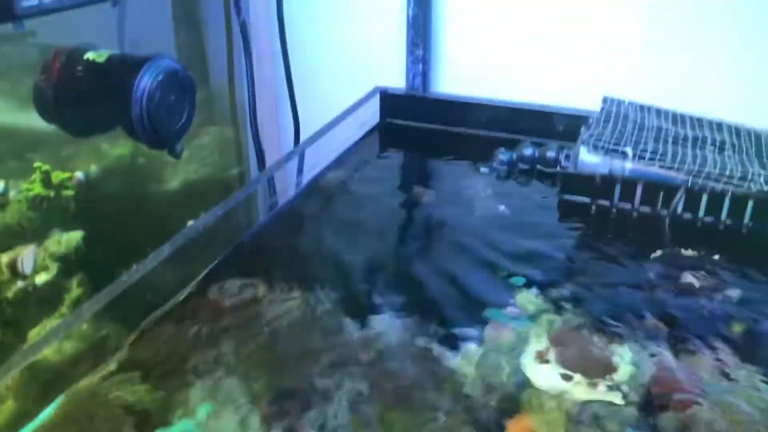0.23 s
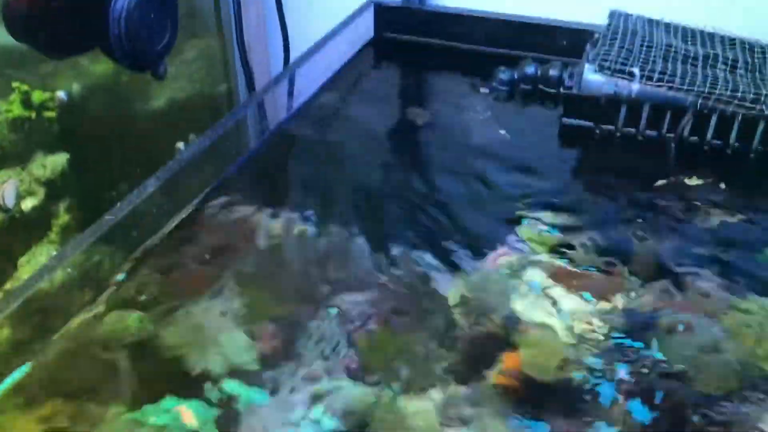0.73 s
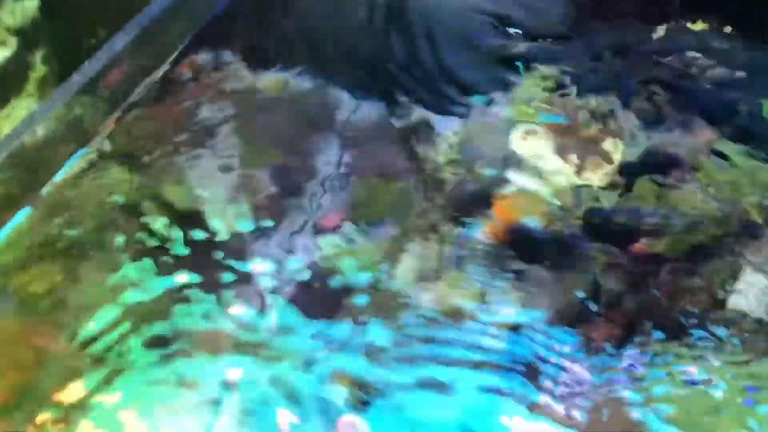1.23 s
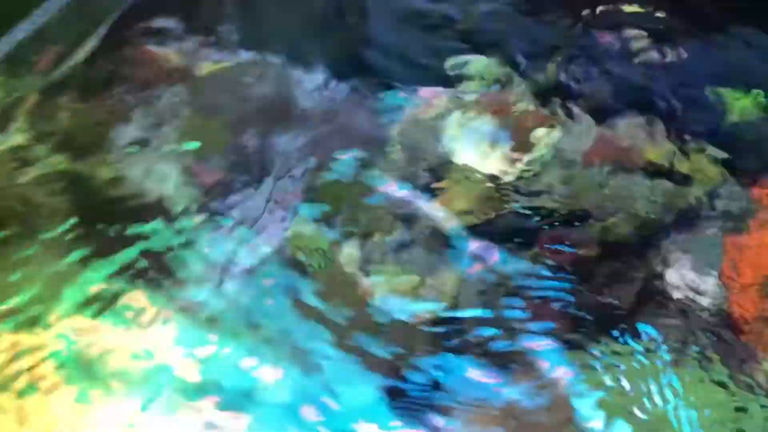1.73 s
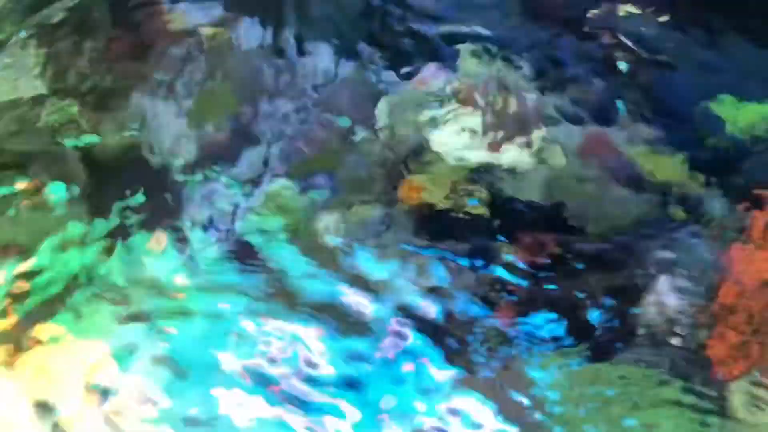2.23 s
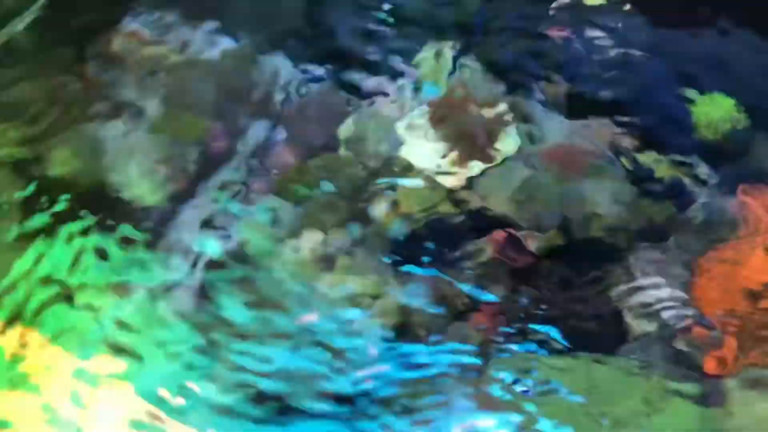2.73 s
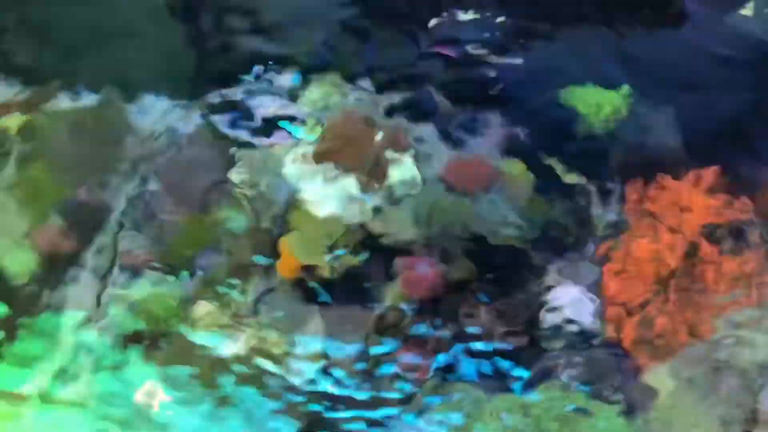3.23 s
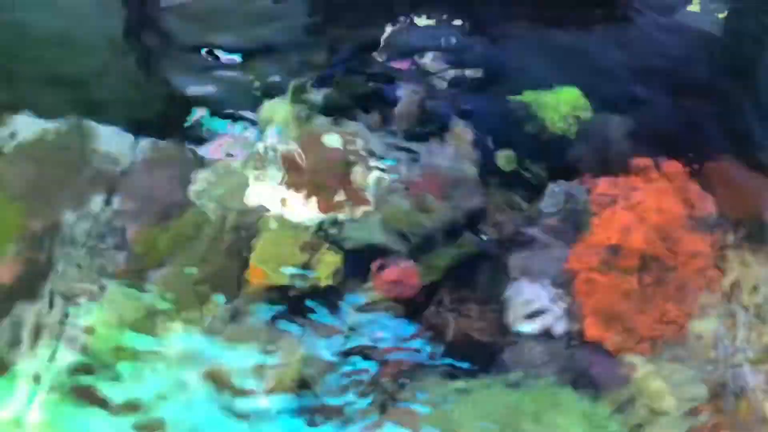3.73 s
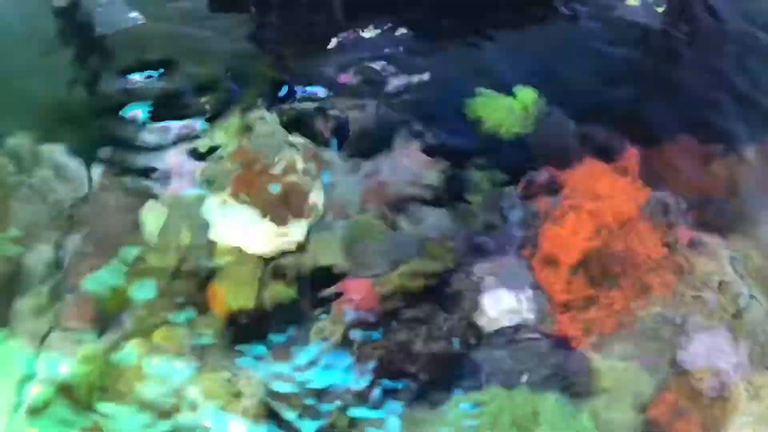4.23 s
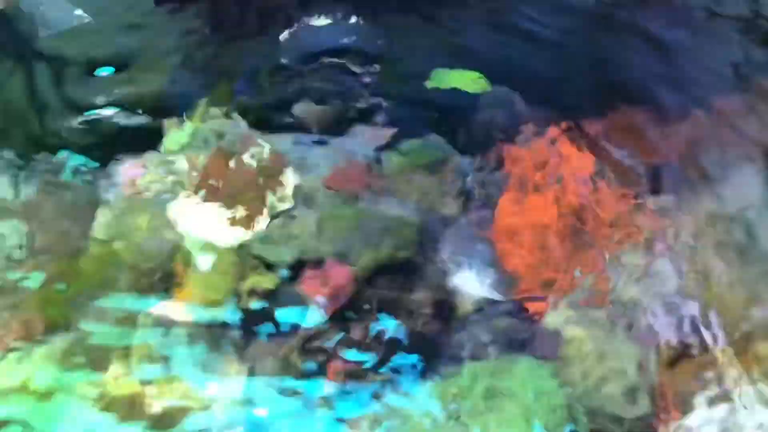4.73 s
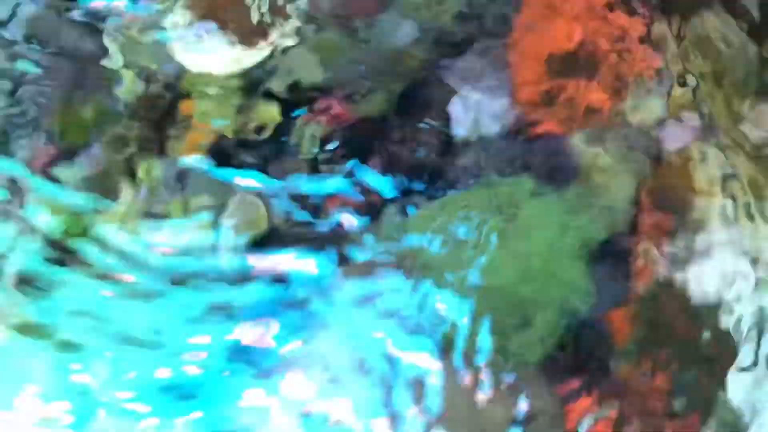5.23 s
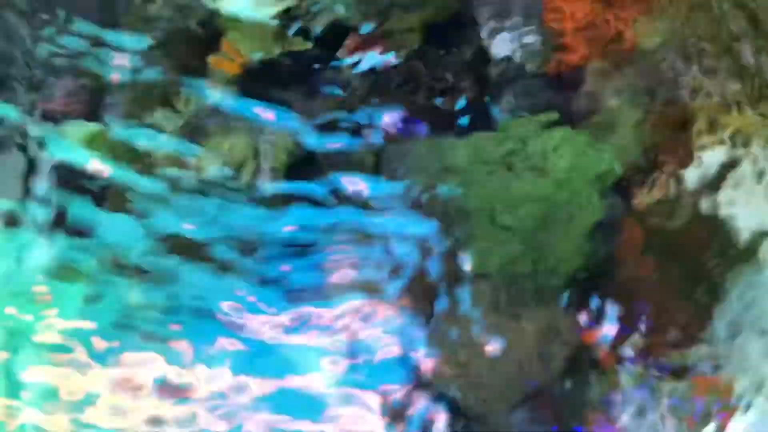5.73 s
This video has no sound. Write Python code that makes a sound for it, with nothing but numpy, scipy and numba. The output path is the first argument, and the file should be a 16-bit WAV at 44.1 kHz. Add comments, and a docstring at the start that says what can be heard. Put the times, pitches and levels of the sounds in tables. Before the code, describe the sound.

A running aquarium pump makes a low, throbbing rumble under a smooth wash of moving water and a faint high whine.

```python
"""A reef tank's pump booms in the lowest resonances of stand and room, heard from a phone over the water.
The flow rings sump and pipe cavities and lays a smooth wash under them, with a thin fizz on top.
A switching supply whines, its pitch swept about 62 times a second through the rings of its housing.
A few soft hisses and faint ticks pass near the microphone."""
import sys
import numpy as np
from scipy import signal
from scipy.fft import rfft, irfft
from scipy.io import wavfile
from scipy.ndimage import uniform_filter1d, map_coordinates
from numba import njit

SR = 44100
rng = np.random.default_rng(int(sys.argv[2]) if len(sys.argv) > 2 else 0)


def wav_record(signal):
    """Record a signal, one row per channel, as 16-bit PCM in the file named by sys.argv[1]."""
    frames = np.transpose(np.atleast_2d(signal))
    bounded = np.clip(frames, -1, 1)
    # unit amplitude maps onto the largest positive 16-bit level
    quanta = np.round(bounded * 32767).astype(np.int16)
    wavfile.write(sys.argv[1], SR, quanta)


N = 264600

# Low resonances of stand and room: (pitch [Hz], width [Hz], level between swells [dB])
BOOM_MODES = [(40.7, 12.6, -37.5), (60.87, 7.7, -39), (80.87, 5.9, -42)]
# Short, strong swells of the boom: (centre time [s], resonance [Hz], gain [dB])
BOOM_SWELLS = [(.12, 41, 5.5), (.12, 60, 7), (.55, 41, 9.5), (.67, 60, 3), (.93, 41, 8.5), (1.45, 60, 8.5),
               (1.52, 41, 8.5), (1.92, 60, 13.5), (2.08, 41, 6), (2.08, 60, 9), (2.44, 41, 3.5),
               (2.52, 82, 2.5), (2.62, 60, 10.5), (2.94, 41, 9.5), (2.99, 60, 7), (3.0, 82, 6),
               (3.09, 41, 5.5), (3.46, 41, 4), (3.46, 82, 2), (3.89, 41, 4.5), (4.31, 41, 7.5),
               (4.64, 41, 10), (4.74, 82, 6), (5.1, 41, 9.5), (5.4, 41, 7.5), (5.87, 60, 6.5)]
def pump_boom(swell_half_s=.043, wander_db=1.5, steadying=.72):
    """The pump shakes stand and room; each resonance wanders in pitch and level, with a few swells."""
    accents = [row + (swell_half_s,) for row in BOOM_SWELLS]
    out = 0
    for hz, width, db in BOOM_MODES:
        rumble = noise_band(hz, width)
        envelope = np.sqrt(uniform_filter1d(rumble ** 2, int(SR / width)) + .0067)
        compressed = unit(bandpass(rumble / envelope ** steadying, hz, 2 * width))
        level_db = db + swells(accents, hz) + standing_waves(hz) + wander_db * wander(14)
        out += undb(level_db) * compressed
    return out


# Slower swells and dips: (centre time [s], resonance [Hz], gain [dB], half length [s])
STANDING_WAVES = [(0.85, 82, 1.5, 0.69), (0.65, 60, 2, 0.3), (2.9, 93, 3, 0.91), (4, 490, 4.5, 0.24),
                  (3.1, 490, 3, 0.33), (4.63, 318, 1, .4), (0.39, 659, 7, 0.2), (0.83, 737, -11, 0.1),
                  (2, 659, 2, 0.36), (2.9, 737, -12, 0.04), (3.74, 737, -4.5, 0.15), (4.2, 737, 2, 0.14),
                  (0.52, 480, 5, 0.48), (2.2, 737, 1, 0.17), (3, 118, -3, 0.17), (2.54, 139, 3, 0.18),
                  (4.86, 139, 4, 0.26), (0.49, 139, 3, 0.38), (1.56, 318, -5.5, 0.55), (2.4, 568, 10, 0.44),
                  (1.8, 1800, 5, 0.48), (3.43, 1800, 6, 0.24), (1.96, 834, 7.5, 0.26), (3.22, 318, 3, 0.34),
                  (3.9, 659, 0, 0.38), (3.93, 834, 7.5, 0.18), (4.36, 118, 3.5, 0.24),
                  (4.16, 568, 6.5, 0.24), (4.85, 737, 6.5, 0.22), (4, 1017, 2, 0.5), (3.1, 834, 1.5, .4),
                  (2, 1340, 2.5, 0.3), (1.94, 404, 2.5, .4), (5.6, 1340, 2, 0.62), (5.45, 659, 3.5, 0.35),
                  (6, 568, 19.5, 0.48)]
def standing_waves(hz):
    """Gain in dB of one resonance, which swells or sinks as the phone travels through standing waves."""
    return swells(STANDING_WAVES, hz)


# Sump and pipe cavities: (pitch [Hz], width [Hz], base level [dB])
CAVITIES = [(28, 24.4, -45), (93.16, 7.1, -48), (118.6, 13.5, -49.5), (140.5, 23, -50), (320, 72, -54.5),
            (403.5, 19.5, -60), (457.4, 56, -60.5), (497.7, 33, -59), (565, 32, -68.5), (662.7, 118, -51),
            (740.4, 98, -52), (829, 200, -57.5), (1014, 99, -56), (1088, 130, -59), (1246.6, 75, -59.5),
            (1340, 104, -60.5), (1807, 150, -70)]
def cavities(bass_below_hz=200, rise_db_per_s=.96, breathe_db=.5):
    """Turbulence rings each cavity; the low ones grow as the phone nears the stand."""
    rise_db = rise_db_per_s * (np.arange(N) - N / 2) / SR
    out = 0
    for hz, width, db in CAVITIES:
        level_db = db + standing_waves(hz) + (hz < bass_below_hz) * rise_db + breathe_db * wander(2.79)
        out += undb(level_db) * noise_band(hz, width)
    return out


# Tone colour of the wash: (frequency [Hz], relative level [dB])
WASH_COLOUR = [(20, -6.5), (70, -8), (150, -20.5), (220, -25), (560, -28), (700, -23), (1280, -28),
               (1550, -30.5), (2000, -35), (3000, -41.5), (3940, -47.5), (6000, -52.5), (7700, -59),
               (10000, -52), (11000, -65.5), (22000, -92)]
# Fader ride on wash and fizz together: (time [s], gain [dB])
FLOW_RIDE = [(0, -0.5), (.7, -1.5), (1.2, 0), (2.5, -0.6), (3.9, 0.4), (4.5, -0.2), (5.4, 0.9), (6, 1.5)]
def water_flow(wash_db=-42, breathe_db=.5, fizz_db=-90.5, flicker_db=2.2):
    """Moving water makes a smooth wash, with a thin, flickering fizz over the surface."""
    hz, db = np.transpose(WASH_COLOUR)
    colour = undb(np.interp(np.log(np.fft.rfftfreq(N, 1 / SR) + 1), np.log(hz), db))
    wash_gain = undb(wash_db + breathe_db * wander(3.39))
    wash = wash_gain * unit(irfft(colour * rfft(rng.standard_normal(N)), N))
    fizz = undb(fizz_db + flicker_db * wander(30)) * noise_band(hz=12900, width=3600)
    return undb(automation(FLOW_RIDE)[0]) * (wash + fizz)


# Pace of the coil's sweep: (time [s], rate [sweeps/s])
SWEEP_RATE = [(0, 61.97), (1, 61.85), (3.8, 61.87), (4.3, 62.0), (4.7, 62.05), (5.2, 62.25), (5.5, 61.95),
              (6, 61.5)]
def coil(top_hz=10464, span_hz=3445, drift_hz=18, jitter_hz=21.67, feet_db=-16, lean_db=3.5):
    """The supply's coil sings in arches of pitch, faint at the feet and louder on the way down."""
    first_crown_s = .0054
    sweeps = np.cumsum(automation(SWEEP_RATE)[0]) / SR - first_crown_s * SWEEP_RATE[0][1]
    place = 2 * ((sweeps + .5) % 1) - 1  # -1 rising foot, 0 crown, 1 falling foot
    depth = np.abs(place) ** 2.2
    hz = top_hz - span_hz * depth + drift_hz * wander(7.4) + jitter_hz * wander(60)
    gain = undb(feet_db * depth ** 1.4 + lean_db * np.sin(np.pi * place))
    return unit(np.sin(2 * np.pi * np.cumsum(hz) / SR) * gain)


# Early reflections: (delay [ms])
ECHO_DELAYS = [5.983, 8.8, 12.4, 17.3, 23.1, 31.7]
# The same reflections against the direct sound: (level [dB])
ECHO_LEVELS = [-7, -18, -7, -13, -16, -17]
def with_echoes(tone, drift_ms=.0096):
    """Echoes off glass and walls fill the gaps between sweeps; their paths drift with the phone."""
    heard = tone.copy()
    for ms, db in zip(ECHO_DELAYS, ECHO_LEVELS):
        lag = (ms + drift_ms * wander(.7)) * SR / 1000
        heard += undb(db) * map_coordinates(tone, [np.arange(N) - lag], order=3)
    return heard


# Rings of the supply's housing: (pitch [Hz], width [Hz], flicker [dB])
HOUSING_RINGS = [(9445, 80, 1.5), (9865, 85, 1.5), (10020, 80, 1.5), (10250, 120, 2.2), (10440, 190, 4)]
# Whine at the moving phone: (time [s], level of the sweep's low legs [dB], level of each ring [dB] x 5)
WHINE_MIX = [(0.0, -68, -79, -73, -73, -76, -77), (0.12, -74, -79, -77, -77, -78, -77),
             (0.8, -72.5, -76, -72, -75, -74, -81), (1.4, -71.5, -77, -79, -76, -67.5, -68),
             (2.04, -70.5, -79, -76, -76, -76, -72), (2.64, -71, -79, -69.5, -76, -81, -72),
             (3.46, -70, -81, -72, -69, -69, -69), (4.41, -70, -76, -73, -75, -75, -72),
             (4.61, -71, -77, -73, -73, -69, -66), (4.93, -73, -86, -82, -76, -71, -65),
             (5.31, -71, -83, -74, -80, -78, -70), (5.52, -76, -84, -79, -77, -68, -68.5),
             (6.0, -73, -79, -74, -72, -70, -65.5)]
def supply_whine(legs_hz=9420):
    """The swept coil excites each housing ring as it passes, over a broad band from its low legs."""
    legs_db, *rings_db = automation(WHINE_MIX)
    tone = with_echoes(coil())
    legs = bandpass(bandpass(tone, legs_hz, width=1900), legs_hz, width=2400)
    out = undb(legs_db) * levelled(legs)
    for db, (hz, width, flicker_db) in zip(rings_db, HOUSING_RINGS):
        out += undb(db + flicker_db * wander(35)) * levelled(bandpass(tone, hz, width))
    return out


# Soft hisses: (peak time [s], rise [s], fall [s], level [dB], centre [Hz], width [Hz])
HISSES = [(.89, .06, .04, -82, 12000, 4000), (1.03, .05, 0.055, -73, 5500, 4000),
          (4.1, 0.18, 0.46, -72, 5030, 2530), (4.632, 0.057, 0.044, -58, 3300, 5000),
          (4.634, 0.043, 0.018, -62.5, 10200, 8000), (4.94, 0.08, 0.12, -63.5, 3260, 1500),
          (4.92, 0.15, 0.23, -70, 6000, 4500), (4.85, .12, 0.2, -75, 12000, 4400),
          (5.065, .013, .013, -74, 11000, 6000), (5.43, .015, .015, -80, 12000, 5000),
          (5.95, 0.12, 0.11, -66, 2930, 2000)]
def hisses(grain_db=1.9):
    """Bands of grainy noise swell and fade."""
    t = np.arange(N) / SR
    out = 0
    for peak_s, rise, fall, db, hz, width in HISSES:
        from_peak = np.abs(t - peak_s) / np.where(t < peak_s, rise, fall)
        envelope = np.exp(-.8 * from_peak ** 1.4)
        out += undb(db + grain_db * wander(90)) * envelope * noise_band(hz, width)
    return out


# Faint ticks: (time [s], peak level [dB], centre [Hz], width [Hz])
TICKS = [(.2503, -66, 12000, 6000), (.5158, -50, 4100, 2200), (.8644, -61, 4500, 2000),
         (.8954, -61, 5000, 3000), (1.4087, -72, 12000, 4000), (1.6347, -66, 9000, 7000),
         (3.164, -52, 6800, 6000), (3.165, -69, 14000, 5000), (3.3657, -69, 12000, 4000),
         (3.578, -58, 8000, 7000), (3.9484, -66, 12000, 4000), (3.9809, -65, 12000, 4000),
         (4.735, -70, 13000, 500), (4.7561, -66, 13000, 500), (4.805, -67, 12800, 497),
         (4.8793, -63, 4700, 2500), (4.962, -60, 3300, 1500), (5.066, -54, 5000, 4000),
         (5.9597, -40, 11500, 4000), (5.9635, -60, 11900, 2970), (5.9813, -52, 13700, 4080),
         (5.9813, -61, 6900, 3020)]
def ticks(t60_s=.022, length=4096):
    """Bright bursts of noise with a sharp attack and a short tail."""
    out = np.zeros(N + length)
    for s, db, hz, width in TICKS:
        puff = rng.standard_normal(length) * 1000. ** (-np.arange(length) / SR / t60_s)
        burst = bandpass(bandpass(puff, hz, width), hz, width)
        start = int(s * SR)
        out[start:start + length] += undb(db) * burst / np.abs(burst).max()
    return out[:N]


def undb(db):
    """Decibels to amplitude."""
    return 10 ** (np.asarray(db) / 20)


def unit(x):
    """Scale to rms 1."""
    return x / np.sqrt(np.mean(x ** 2))


def levelled(x):
    """Hold the rms near 1 over a sliding quarter second."""
    return x / np.sqrt(uniform_filter1d(x ** 2, SR // 4))


def automation(table):
    """One curve per value column of a (time [s], values) table, at every sample."""
    times, *columns = np.transpose(table)
    return [np.interp(np.arange(N) / SR, times, column) for column in columns]


def swells(rows, own_hz):
    """Gain in dB from the bell-shaped swells tuned within about 8% of one resonance."""
    t = np.arange(N) / SR
    return sum(db * np.exp(-.5 * ((t - s) / half_s) ** 2)
               for s, hz, db, half_s in rows if abs(np.log(hz / own_hz)) < .08)


@njit
def bandpass(x, hz, width):
    """State-variable band-pass, gain 1 at the centre; width in Hz."""
    y, band_state, low_state = np.empty(len(x)), 0., 0.
    tuning, damping = np.tan(np.pi * hz / SR), width / hz
    for i in range(len(x)):
        band = (band_state + tuning * (x[i] - low_state)) / (1 + tuning * (tuning + damping))
        band_state = 2 * band - band_state
        low_state += 2 * tuning * band
        y[i] = damping * band
    return y


def noise_band(hz, width):
    """Noise through a resonance twice, already ringing at the start, rms 1."""
    noise = rng.standard_normal(N + SR // 5)
    return unit(bandpass(bandpass(noise, hz, width), hz, width)[-N:])


def wander(per_s):
    """Random sample-and-hold at per_s steps a second, slewed twice, rms 1."""
    hold = int(SR / per_s)
    steps = np.repeat(rng.standard_normal(N // hold + 1), hold)
    return unit(uniform_filter1d(uniform_filter1d(steps, hold), hold)[:N])


def scene():
    """The mono mix, from the pump's boom to the faintest details."""
    return (pump_boom() + cavities() + water_flow() + supply_whine() + hisses() + ticks())[None]


def record(dry):
    """The phone drops the deepest bass and cuts the top."""
    low_cut = signal.butter(2, 20, "high", fs=SR, output="sos")
    high_cut = signal.ellip(8, .2, 70, 15400, fs=SR, output="sos")
    return signal.sosfilt(high_cut, signal.sosfilt(low_cut, dry))


dry = scene()
out = record(dry)
wav_record(out)
```